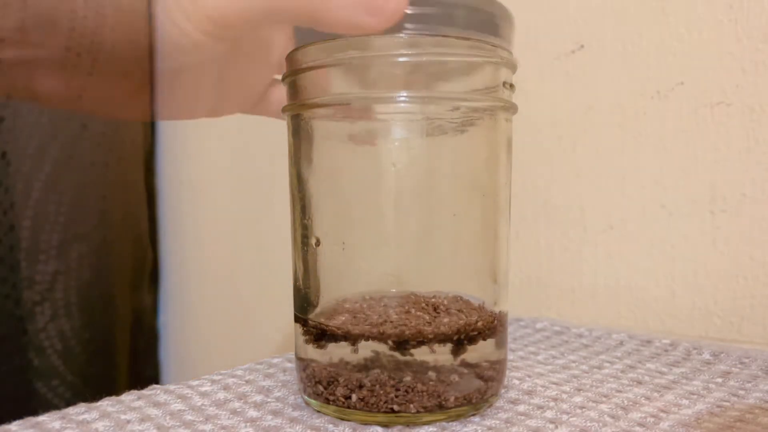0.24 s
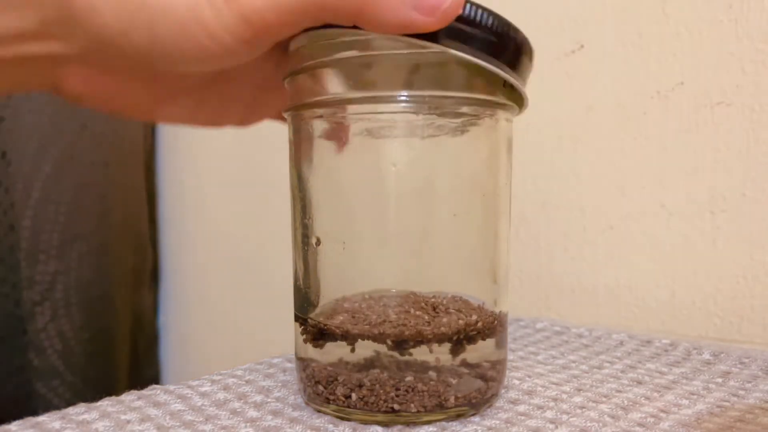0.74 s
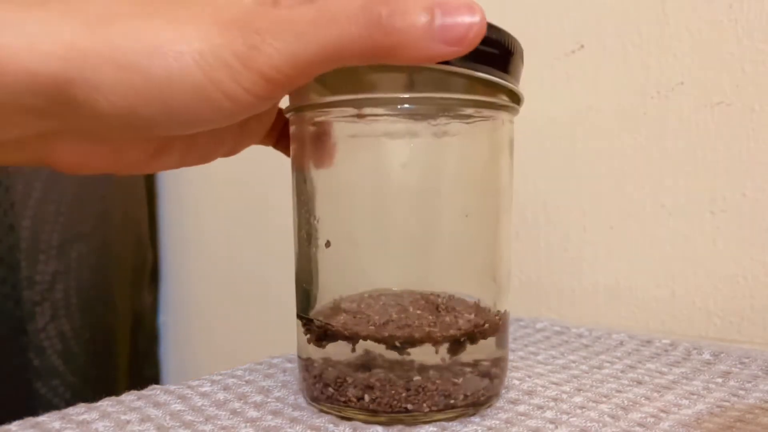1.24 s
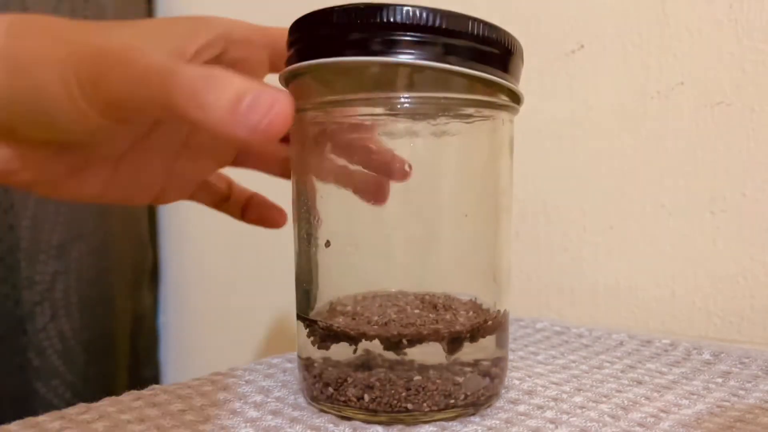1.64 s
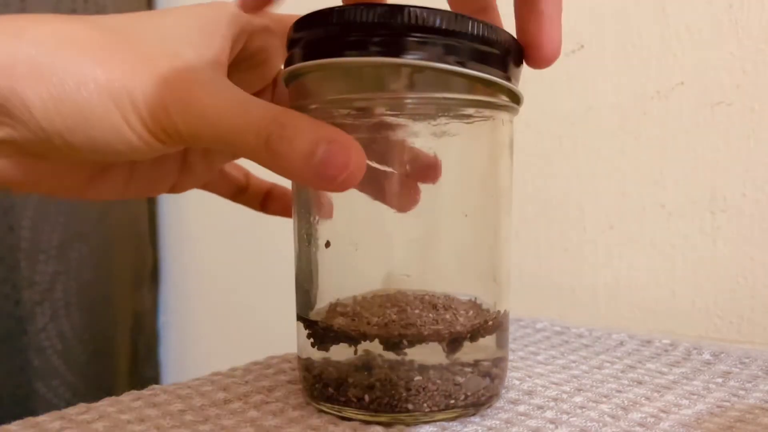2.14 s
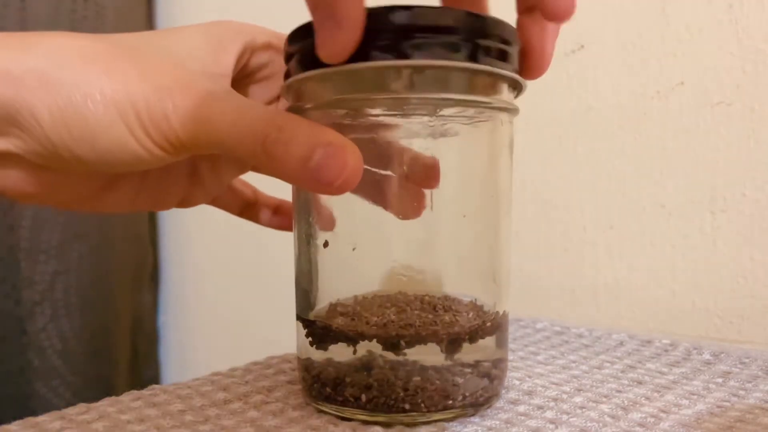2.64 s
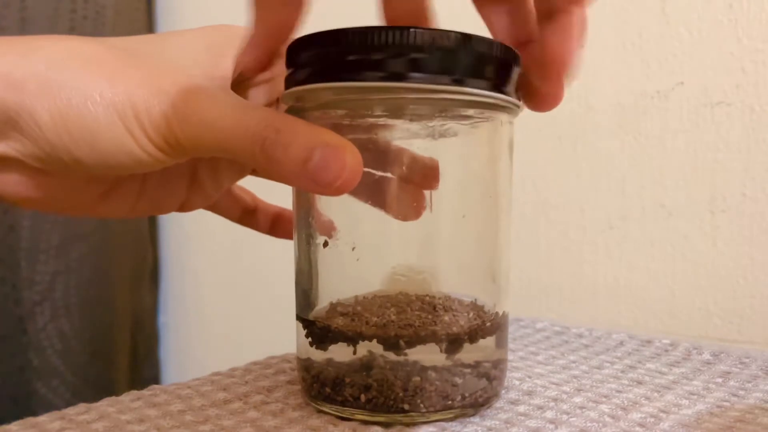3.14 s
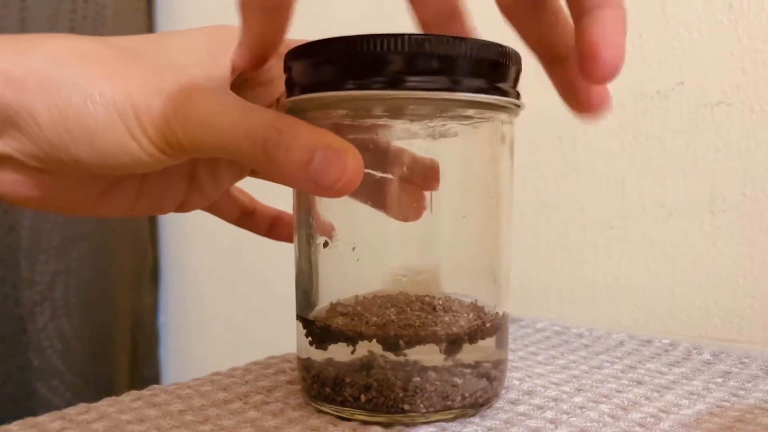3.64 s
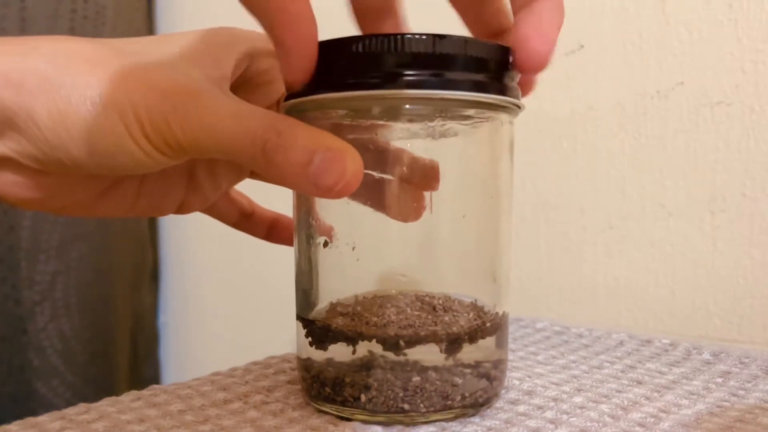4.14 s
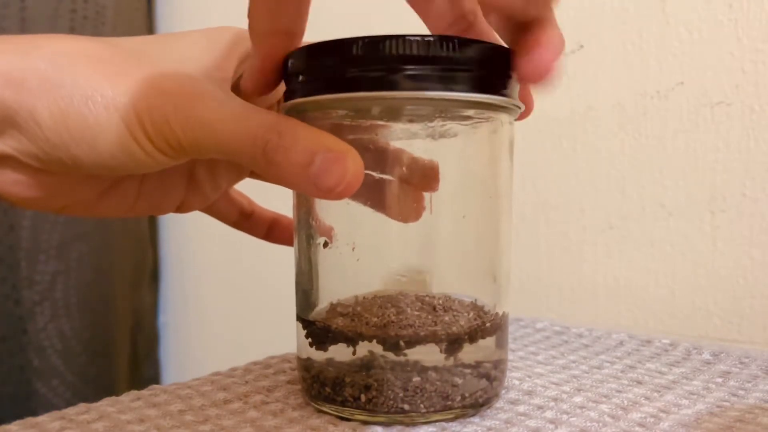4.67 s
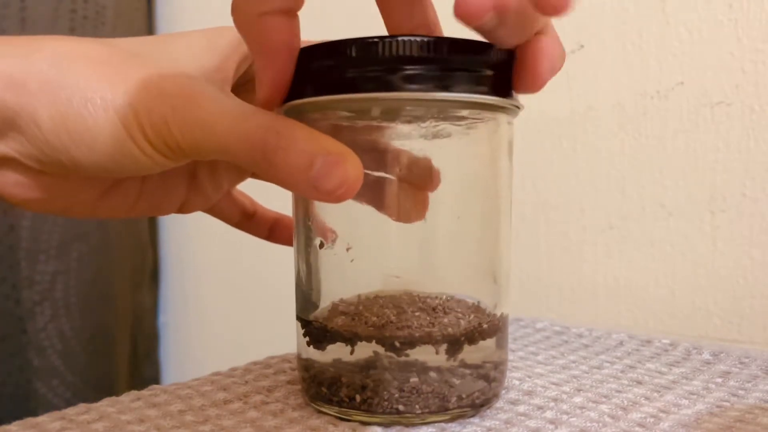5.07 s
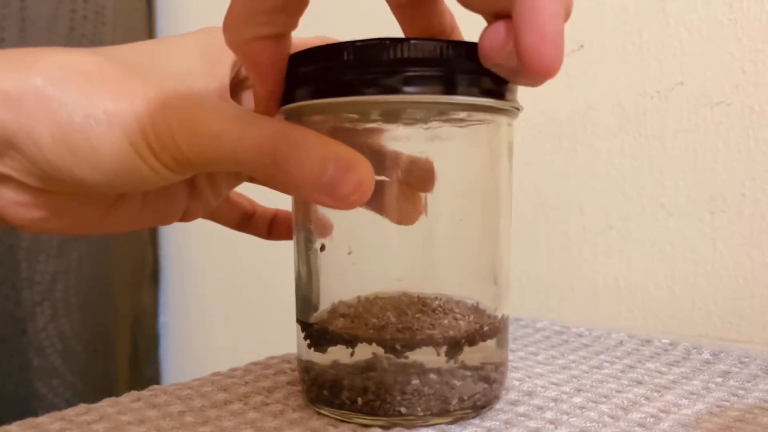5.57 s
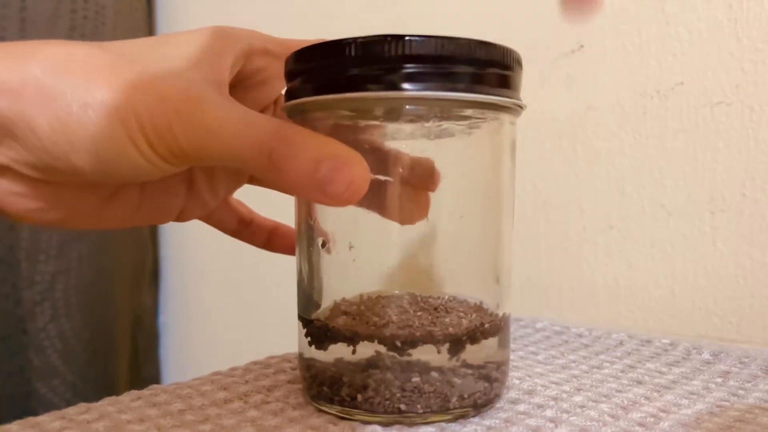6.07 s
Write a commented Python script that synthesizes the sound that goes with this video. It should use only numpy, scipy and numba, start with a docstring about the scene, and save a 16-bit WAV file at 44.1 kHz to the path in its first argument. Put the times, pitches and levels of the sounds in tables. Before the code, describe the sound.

A metal lid lands on an empty-sounding glass jar with bright clacks and short hollow scrapes in the first second. After a quieter pause with faint finger rustling, it is screwed on in quick, uneven grating turns with ringing knocks. Two firm clunks and soft thumps on a mat follow, then light sliding fingers. Close stereo microphone in a small quiet room with low ventilation rumble.

```python
"""Twisting a lid onto a jar

A metal screw lid is set on a glass jar and twisted shut by hand, close to a two-port microphone.
Random slips on the threads and single knocks make the lid and the glass ring; sliding fingertips are
a hiss of fine clicks, and short low tones are the jar's thumps on a mat. Feedback delays make the echo
of a quiet room, and shaped noise makes the low ventilation rumble underneath."""
import sys
import numpy as np
from scipy import signal
from scipy.fft import rfft, irfft, next_fast_len
from scipy.io import wavfile
from scipy.ndimage import uniform_filter1d
from numba import njit

SR = 44100
rng = np.random.default_rng(int(sys.argv[2]) if len(sys.argv) > 2 else 0)


def dump(signal):
    """Clip the signal to [-1, 1] and save it as 16-bit WAV at the path in sys.argv[1]."""
    limited = np.clip(np.atleast_2d(signal).T, -1, 1)
    pcm = np.round(limited * 32767).astype(np.int16)
    wavfile.write(sys.argv[1], SR, pcm)


def linear_from_db(decibels):
    """Turn decibels (scalar or array-like) into linear amplitude factors; 0 gives 1."""
    return 10 ** (np.asarray(decibels, float) / 20)


N = 278271   # length in samples


def rms_one(x):
    """Scales to rms 1."""
    return x / np.sqrt(np.mean(x ** 2) + 1e-20)


def at_hz(points):
    """Reads a (f/Hz, value) table at every frequency bin, along a logarithmic pitch scale."""
    hz, value = np.transpose(points)
    bins_hz = np.arange(1, N // 2 + 2) * SR / N
    return np.interp(np.log(bins_hz), np.log(hz), value)


def at_time(points, s):
    """Reads a (t/s, value) table at the times s."""
    return np.interp(s, *np.transpose(points))


def colour(x, spectrum):
    """Gives x a tone colour: multiplies its spectrum by a curve in dB, then scales to rms 1."""
    return rms_one(irfft(rfft(x) * linear_from_db(at_hz(spectrum)), N))


def band(x, low_hz, high_hz):
    """Steep band-pass, rms 1."""
    return rms_one(signal.sosfilt(signal.butter(3, [low_hz, high_hz], "band", fs=SR, output="sos"), x))


def drift(rate_hz):
    """Slow random wavering of rms 1: noise smoothed twice, made at every 40th sample and joined by lines."""
    r = np.exp(-2 * np.pi * rate_hz * 40 / SR)
    noise = rng.standard_normal(N // 40 + 2002)
    slow = signal.lfilter([1], [1, -2 * r, r * r], noise)[2000:]   # skips the filter's start-up
    return np.interp(np.arange(N) / 40, np.arange(len(slow)), rms_one(slow))


def grains(per_s, spread_db):
    """Random clicks of uneven size and either sign, rms 1."""
    sizes_db = spread_db * np.minimum(rng.exponential(1, N), 5)
    sizes = linear_from_db(sizes_db) * rng.choice([-1, 1], N)
    happens = rng.random(N) < per_s / SR
    return rms_one(sizes * happens)


def strokes(s, held, rise, fall, level_db):
    """Each hand stroke swells at a steady dB rate, holds and fades; averaging over 5 ms softens the corners."""
    power = np.zeros(N)
    for at, hold, up, down, db in np.broadcast(s, held, rise, fall, level_db):
        start = max(round((at - 60 / up) * SR), 0)   # from 60 dB below full level ...
        stop = min(round((at + hold + 60 / down) * SR), N)   # ... and back down to it
        t = np.arange(start, stop) / SR
        before, after = np.maximum(at - t, 0), np.maximum(t - at - hold, 0)
        power[start:stop] += linear_from_db(db - up * before - down * after) ** 2
    return uniform_filter1d(np.sqrt(power), size=220)


def ring(clicks, hz, t60):
    """A resonance: a unit click starts a sine of height 1 that falls by 60 dB in t60 seconds."""
    r, w = linear_from_db(-60 / (t60 * SR)), 2 * np.pi * hz / SR
    return signal.lfilter([0, np.sin(w)], [1, -2 * r * np.cos(w), r * r], clicks + 1e-18)


# the natural tones of lid and glass: (f/Hz, relative level/dB, time to fall by 60 dB when undamped/s)
BODY_TONES = [(475, -33, 0.34), (510, -21, 0.63), (619.4, 5.5, 0.1), (626, -6.5, 0.13), (974, -17, 0.21),
              (1338, -16, 0.086), (1587, -14, 0.096), (2242, -2.5, 0.054), (2743, -5, 0.33),
              (2803, -13, 0.094), (3180, -15.5, .1), (3640, -14.5, 0.13), (4042, -14, 0.21),
              (4220, -18, 0.17), (4680, -8, 0.022), (5050, -13, 0.1), (6580, -4, 0.043), (7260, -2, 0.08),
              (10150, -12, 0.091), (12000, -29, 0.086), (13500, -30.5, .15), (13700, -20.5, 0.16)]


def modes(x, drive, low_hz, high_hz, damp, wander_db):
    """Rings the body's tones in one range, damped by contact; the moving contact point favours each in turn."""
    chosen = [(linear_from_db(db), hz, t60 * damp) for hz, db, t60 in BODY_TONES if low_hz < hz < high_hz]
    # the loudness expected of all these tones under clicks of rms 1
    steady = np.sqrt(sum(gain * gain * t60 for gain, hz, t60 in chosen) * SR / (12 * np.log(10)))
    total = 0
    for gain, hz, t60 in chosen:
        favour = linear_from_db(wander_db * drift(8.7))
        total = total + gain * ring(x * drive * favour, hz, t60)
    return total / steady


# the phase between the two microphone ports: (f/Hz, lead of left over right/radians)
PORT_LEAD = [(60, .15), (340, .45), (520, 1.6), (690, 2.05), (1000, 1.6), (1380, .3), (2000, .5),
             (2760, 1.8), (3500, .3), (4700, .7), (6200, -1.05), (7500, -2.6), (8600, -3.15), (10000, -3.9),
             (12200, -6.28)]


def ports(common, own, balance):
    """Each port hears the shared sound with its own level and phase, plus what only it picks up."""
    tilt = linear_from_db(at_hz(balance) / 2) * np.exp(.5j * at_hz(PORT_LEAD))   # half to each side
    return irfft(rfft(common + own) * np.array([tilt, 1 / tilt]), N)


# ventilation below, microphone hiss on top: (f/Hz, relative level/dB per Hz)
RUMBLE_COLOUR = [(28, -23), (42, -1), (128, -3.5), (162, -13.5), (200, -3.5), (300, -14), (450, -20.5),
                 (640, -20), (900, -17.5), (1200, -25.5), (2300, -37), (2700, -45.5), (3300, -50),
                 (3800, -60), (10000, -66.5), (13500, -70), (16000, -65.5)]
# duct resonances: (f/Hz, width/Hz, level/dB before a common boost)
DUCT_PEAKS = [(72, 19, -13.5), (136, 9.4, -7.5), (195.1, 4.5, 7.5), (246.3, 4.8, 3)]
# how alike the ports hear the room noise: (f/Hz, share of the power common to both)
NOISE_LIKENESS = [(60, 0.93), (260, 0.96), (430, 0.62), (1000, 0.31), (5000, 0.033), (7500, 0.77),
                  (13000, 1)]
# room noise in the two ports: (f/Hz, left over right level/dB)
NOISE_BALANCE = [(60, 3), (180, -2.5), (550, 1.5), (1650, -1), (4970, 4), (15000, -3)]


def rumble():
    """Room noise: shaped random noise with a few duct resonances; its overall level wavers gently."""
    hz = np.arange(N // 2 + 1) * SR / N
    white = rng.standard_normal((3, N))
    alike = np.clip(at_hz(NOISE_LIKENESS), 0, 1)
    peaks = sum(linear_from_db(db + 5.0) / (1 + ((hz - f) / width * 2) ** 2) for f, width, db in DUCT_PEAKS)
    shape = linear_from_db(at_hz(RUMBLE_COLOUR)) * (1 + peaks)
    common = irfft(rfft(white[0]) * shape * np.sqrt(alike), N)
    own = irfft(rfft(white[1:]) * shape * np.sqrt(1 - alike), N)
    level = linear_from_db(-43 + 1.0 * drift(6.6))
    return level * rms_one(ports(common, own, NOISE_BALANCE))


# the lid turns on the threads:
# (t/s at full level, held/s, lid boom level/dB, paint hiss level/dB, jar shake level/dB), before mixing
LID_TWISTS = [(0.127, 0.012, -59.5, -84, -51), (0.243, 0.0035, -51, -79, -60),
              (0.443, 0.067, -41, -66.5, -46), (.69, .015, -48.5, -97, -44),
              (0.729, 0.032, -35, -53.5, -44.5), (0.786, 0.0077, -44.5, -48, -40),
              (.825, 0.013, -77, -83, -40), (1.008, 0.0035, -77, -70, -41),
              (2.541, 0.0085, -48.5, -66.5, -39), (2.582, 0.019, -43, -65, -40),
              (2.661, 0.012, -49, -71, -48), (2.739, 0.058, -55.5, -78, -39.5),
              (2.85, 0.045, -52.5, -75, -41.5), (2.924, 0.028, -38.5, -63.5, -38),
              (3.01, 0.047, -41.5, -58, -36), (3.352, 0.032, -42.5, -73, -44),
              (3.466, 0.04, -36, -73, -32.5), (3.538, 0.015, -43, -70, -36),
              (3.747, 0.0089, -41.5, -63.5, -34.5), (3.79, 0.037, -48.5, -70, -41.5),
              (3.83, .02, -43, -63, -41), (3.862, 0.04, -28, -52.5, -37), (3.93, 0.016, -45, -81, -45),
              (4.167, 0.048, -37, -61.5, -39), (4.233, 0.034, -34, -57, -32.5),
              (4.445, .015, -57, -71, -51), (4.47, .035, -39, -64, -40.5), (4.52, 0.051, -46, -60, -46.5),
              (4.573, 0.0067, -35.5, -55, -46.5)]
TWIST_RISE_DB_PER_S, TWIST_FALL_DB_PER_S = 582, 521
BRIGHT_STEEPNESS = 1.6   # the treble sets in and stops this much more abruptly than the boom
# grind, glass and rustle lie between boom and hiss: (share that follows the hiss, level added/dB)
GRIND, SINGING, RUSTLE = (0.22, -4), (0.86, 0), (1, -7.5)


def turning():
    """How the hand drives each sound: gains of shake, boom, grind, singing, hiss and rustle over the twists."""
    s, held, boom_db, hiss_db, shake_db = np.transpose(LID_TWISTS)
    grind_db, glass_db, rustle_db = [boom_db + share * (hiss_db - boom_db) + added
                                     for share, added in (GRIND, SINGING, RUSTLE)]
    rise, fall = TWIST_RISE_DB_PER_S, TWIST_FALL_DB_PER_S
    dull = [strokes(s, held, rise, fall, db) for db in (shake_db, boom_db, grind_db)]
    rise, fall = BRIGHT_STEEPNESS * rise, BRIGHT_STEEPNESS * fall
    bright = [strokes(s, held, rise, fall, db) for db in (glass_db, hiss_db, rustle_db)]
    return dull + bright


@njit
def gliding(x, cosine, r):
    """A resonance whose pitch (cosine) and damping (r) change from sample to sample."""
    y = np.zeros_like(x)
    for i in range(2, len(x)):
        push = np.sqrt(1 - r[i] ** 2) * (x[i] - x[i - 2])
        y[i] = push + 2 * r[i] * cosine[i] * y[i - 1] - r[i] ** 2 * y[i - 2]
    return y


# how freely the glass rings as the other hand takes hold and the lid tightens: (t/s, share of full ringing)
RING_FREEDOM = [(0, 0.74), (.9, 0.53), (2.4, 0.27), (3.9, 0.48), (4.9, 0.16), (6.3, .07)]
# pitch of the lid disc under the changing grip: (t/s, f/Hz)
DISC_PITCH = [(.12, 716), (.25, 590), (.5, 627), (.73, 514), (.84, 510), (2.55, 510), (2.95, 470),
              (3.07, 617), (3.37, 550), (3.5, 484), (3.75, 610), (3.87, 670), (3.899, 662), (3.96, 526),
              (4.16, 477), (4.25, 623), (4.45, 530), (4.85, 567)]


def rubbing(shake, boom, grind, singing):
    """Threads stick and slip: the slips drive the body's tones and are partly heard directly as rough noise."""
    t = np.arange(N) / SR
    disc_hz = at_time(DISC_PITCH, t)
    slips = grains(per_s=2500, spread_db=3.2) * linear_from_db(2.2 * drift(45))
    free = np.clip(at_time(RING_FREEDOM, t), .05, 2)
    width_hz = 22 + 12 / free   # a firmer grip widens the disc resonance
    disc = gliding(slips * boom, np.cos(2 * np.pi * disc_hz / SR), np.exp(-np.pi * width_hz / SR))
    lid_tones = modes(slips, boom, 0, 800, damp=.45, wander_db=3.0)
    lid = .35 * disc + .55 * lid_tones + .35 * boom * band(slips, 330, 760)
    rim_tones = modes(slips, grind, 800, 2000, damp=0.31, wander_db=3.5)
    rim = 0.31 * rim_tones + 0.24 * grind * band(slips, 650, 1360)
    glass_tones = modes(slips, singing * free ** .35, 2000, 3000, damp=.15, wander_db=4.0)
    glass = 1.3 * glass_tones + .22 * singing * band(slips, 1900, 3300)
    return shake * band(slips, 166, 456) + lid + rim + glass


# lid knocks on the glass, levels before filtering and mixing:
# (t/s, crack level/dB, clack level/dB, lid disc level/dB, lid disc under the grip f/Hz)
LID_KNOCKS = [(0.108, -27.5, -33.5, -28, 858), (0.2286, -26, -39, -33, 665), (0.483, -30, -36, -30, 615),
              (0.5334, -54, -69, -34, 645), (0.7265, -36, -43, -26.5, 595), (0.734, -45, -54, -22, 555),
              (0.7896, -31.5, -36, -30.5, 664), (0.8215, -57.5, -58, -36.5, 510),
              (1.0058, -76, -53, -34.5, 579), (1.2755, -63, -69, -53.5, 417), (2.5352, -62, -45, -38, 542),
              (2.5844, -35.5, -30, -35.5, 374), (2.6618, -36, -44, -66, 646), (2.7219, -29, -33, -32, 520),
              (2.7856, -64.5, -59, -37, 568), (2.8269, -49.5, -40.5, -33, 416),
              (2.9195, -52, -38, -29, 532), (3.015, -47, -38, -29, 517), (3.0602, -39, -42, -21, 667),
              (3.34, -42, -42, -56, 600), (3.448, -57, -59, -39, 540), (3.5024, -67, -62, -25.5, 513),
              (3.7244, -33, -25.5, -28, 705), (3.729, -34.5, -29, -29, 893), (3.8601, -46, -45, -23.5, 563),
              (4.1388, -48.5, -47, -34, 538), (4.2643, -41, -39, -25, 529), (4.4867, -43, -37, -29, 600),
              (4.5754, -37, -39, -31.5, 636), (4.8335, -38, -30, -62, 565), (4.841, -32, -25, -30, 581),
              (5.306, -24, -21, -31, 504), (5.314, -42.5, -35, -25, 510), (5.447, -29.5, -25, -32.5, 662),
              (5.45, -40, -36, -27.5, 459), (5.5029, -51.5, -47.5, -46.5, 443),
              (5.613, -41, -43.5, -62, 926), (5.901, -60, -69, -56, 557), (6.2692, -51.5, -58, -80, 865)]
DISC_CYCLES, SEALED_CYCLES = 29.4, 35   # swings in which the struck disc falls by 60 dB: before, once sealed
SEALED_S = 5.2   # from here on the jar is sealed
CONTACT_S = 0.0013   # the noise of a blow builds up over the length of the contact


def knocks():
    """A bright crack, a duller clack, the gripped lid disc at its own pitch, and every tone struck unevenly."""
    t = np.arange(SR // 3) / SR
    tones, cracks, clacks = np.zeros((3, N + len(t)))
    bursts = rng.standard_normal((len(LID_KNOCKS), len(t))) * (1 - np.exp(-t / CONTACT_S))
    chance = rng.standard_normal((len(LID_KNOCKS), len(BODY_TONES)))
    mode_hz, mode_db, mode_t60 = np.transpose(BODY_TONES)[:, :, None]
    swing = np.sin(2 * np.pi * mode_hz * t)
    for noise, luck, (s, crack_db, clack_db, disc_db, hz) in zip(bursts, chance, LID_KNOCKS):
        here = slice(round(s * SR), round(s * SR) + len(t))
        free = max(at_time(RING_FREEDOM, s), .03)
        snap = linear_from_db(-60 * t / 0.016)
        tail = linear_from_db(-36.5 - 60 * t / (0.5 * free + .1))   # faint, and longer the freer the glass
        cracks[here] += linear_from_db(crack_db) * noise * (snap + tail)
        clacks[here] += linear_from_db(clack_db) * noise * linear_from_db(-60 * t / 0.028)
        t60 = (DISC_CYCLES if s < SEALED_S else SEALED_CYCLES) / hz
        rise = 1 - np.exp(-t / (0.039 * t60))   # low discs ring longest and build up slowest
        disc = rise * linear_from_db(-60 * t / max(t60, .01)) * np.sin(2 * np.pi * hz * t)
        tones[here] += linear_from_db(disc_db + 6.5) * disc
        # low tones follow the disc, middle ones the clack, high ones the crack
        blow_db = np.select([mode_hz < 800, mode_hz < 2000], [disc_db - 12.0, clack_db - 0.5], crack_db - 13)
        blow_db = blow_db + mode_db + 3 * luck[:, None]
        tones[here] += np.sum(linear_from_db(blow_db - 60 * t / (mode_t60 * free)) * swing, axis=0)
    crisp = signal.sosfilt(signal.butter(2, [2300, 15500], "band", fs=SR, output="sos"), cracks)
    dull = signal.sosfilt(signal.butter(2, [900, 2500], "band", fs=SR, output="sos"), clacks)
    return (tones + linear_from_db(-3) * crisp + linear_from_db(4.0) * dull)[:N]


# fingertips slide over the lid, levels before mixing:
# (t/s at full level, held/s, swell/dB per s, fade/dB per s, hiss level/dB, duller rustle level/dB)
FINGER_SLIDES = [(.27, .08, 300, 200, -82, -76), (.52, .04, 300, 200, -79, -68),
                 (.6, .1, 200, 200, -82, -84), (2.62, .02, 400, 300, -78.5, -84),
                 (.385, 0.059, 253, 298, -77, -59.5), (1.14, .02, 197, 201, -87, -84),
                 (1.278, .1, 1503, 593, -85, -89.5), (2.066, .01, 896.5, 249, -84, -92),
                 (2.2, .01, 248, 254, -93, -88), (2.38, 0.044, 170, 350, -77, -74.5),
                 (3.12, 0.0056, 900, 696, -78, -95), (3.188, .01, 1500, 900, -86, -100),
                 (3.25, 0.043, 1497, 450, -67, -74), (4.135, 0.014, 2000, 302, -67, -82),
                 (4.335, 0.03, 400, 402, -88, -95), (4.415, 0.024, 900, 300, -83, -82),
                 (4.63, 0.037, 400, 600, -78, -88), (4.761, 0.049, 600, 300, -66.5, -93),
                 (4.955, 0.0086, 1498, 403, -65.5, -70), (5.1, 0.13, 294, 250, -75, -83),
                 (5.899, .13, 803, 216, -69, -69), (6.3, .01, 897, 897, -85, -85)]
# tone colour of skin and paint sliding: (f/Hz, relative level/dB per Hz)
HISS_COLOUR = [(4500, -33.5), (6200, -16), (7400, 11), (8600, 1), (10000, 6), (12000, -7), (13900, 8.5),
               (15500, -7.5), (16000, -26)]
CHATTER_DB, CHATTER_T60_S = -18.5, 0.18   # level against the crack; time to fall by 60 dB at freedom 1


def sliding(twist_hiss, twist_rustle):
    """Skin and paint slide: fine dense clicks make hiss and rustle, and also tickle the higher tones."""
    s, held, swell, fade, hiss_db, rustle_db = np.transpose(FINGER_SLIDES)
    knock_s, crack_db = np.transpose(LID_KNOCKS)[:2]
    # a knocked lid rustles on against the glass, the longer the freer it is
    chatter_fall = 60 / (CHATTER_T60_S * at_time(RING_FREEDOM, knock_s).clip(.1))
    chatter = strokes(knock_s, 0, 5300, chatter_fall, crack_db + CHATTER_DB)
    hiss = twist_hiss + strokes(s, held, swell, fade, hiss_db)
    rustle = twist_rustle + strokes(s, held, swell, fade, rustle_db) + chatter
    fine = grains(per_s=11000, spread_db=4.5) * linear_from_db(2.5 * drift(40))
    shrill = modes(fine, hiss, 5500, SR, damp=1.0, wander_db=5.0)
    tinny = modes(fine, rustle, 3000, 5500, damp=0.29, wander_db=1.0)
    bright = 1.16 * hiss * colour(fine, HISS_COLOUR) + 0.034 * shrill
    return bright + 0.23 * rustle * band(fine, 3700, 4940) + 0.1 * tinny


# the jar bumps on the mat: (t/s of the middle, peak level/dB before the ports, f/Hz, half length/s)
MAT_THUMPS = [(3.071, -30, 103, 0.0073), (3.872, -20, 259, 0.013), (4.141, -27.5, 300, 0.0024),
              (4.857, -28.5, 77, 0.0067), (5.334, -22.5, 66, .01), (5.352, -27, 72, 0.0086),
              (5.477, -18.5, 74, 0.014)]


def thumps():
    """The jar lands on the soft mat: a short low tone that swells and dies away under a bell-shaped curve."""
    t = np.arange(N) / SR
    total = np.zeros(N)
    for s, db, hz, half in MAT_THUMPS:
        bell = np.exp(-((t - s) / half) ** 2)
        total += linear_from_db(db) * bell * np.cos(2 * np.pi * hz * (t - s))
    return total


ROOM_T60_S, WALL_CUT_HZ = 0.16, 1670   # echo's time to fall by 60 dB in the bass; treble loss per round


def room(x):
    """Echoes between walls: eight feedback delays a side, weaker and duller on every round."""
    size = next_fast_len(N + SR)
    w = 2 * np.pi * np.arange(size // 2 + 1) / size
    dull = 1 / (1 + 1j * w * SR / (2 * np.pi * WALL_CUT_HZ))
    out = np.zeros((2, len(w)), complex)
    for k, lag in enumerate(rng.uniform(.006, 0.029, 16) * SR):
        loop = linear_from_db(-60 * lag / SR / ROOM_T60_S) * dull * np.exp(-1j * w * lag)
        out[k % 2] += loop / (1 - loop) * (-1) ** (k // 2)   # all rounds at once, signs taking turns
    return irfft(rfft(x, size) * out, size)[:, :N]


# the nearby jar in the two ports: (f/Hz, left over right level/dB)
JAR_BALANCE = [(60, 5.5), (210, 0.7), (430, 0.3), (690, 5), (950, 19), (1300, 14), (1700, 0.5), (2500, 8),
               (4000, 2), (5500, 5), (8600, 4), (12000, -2.5)]


def scene():
    """The jar close by, its echoes and the room noise."""
    *threads, hiss, rustle = turning()
    jar = rubbing(*threads) + sliding(hiss, rustle) + knocks() + thumps()
    echoes = linear_from_db(-16) * room(jar)
    return ports(jar, echoes, JAR_BALANCE) + rumble()


def band_limit(x):
    """A steep low-pass at the top of the band."""
    return signal.sosfilt(signal.butter(12, 16520, fs=SR, output="sos"), x)


def record(dry):
    """Filters cut the deepest bass and the very top."""
    no_bass = signal.sosfilt(signal.butter(4, 34, "high", fs=SR, output="sos"), dry)
    mix = signal.sosfilt(signal.butter(10, 15900, fs=SR, output="sos"), no_bass)
    return band_limit(mix)


dry = scene()
out = record(dry)
dump(out)
```